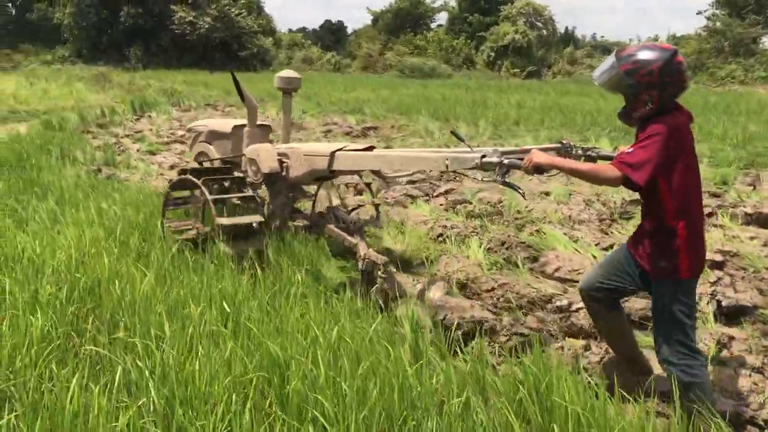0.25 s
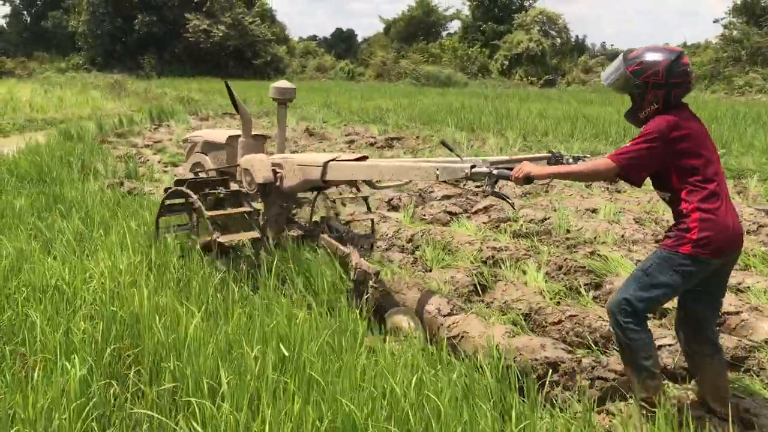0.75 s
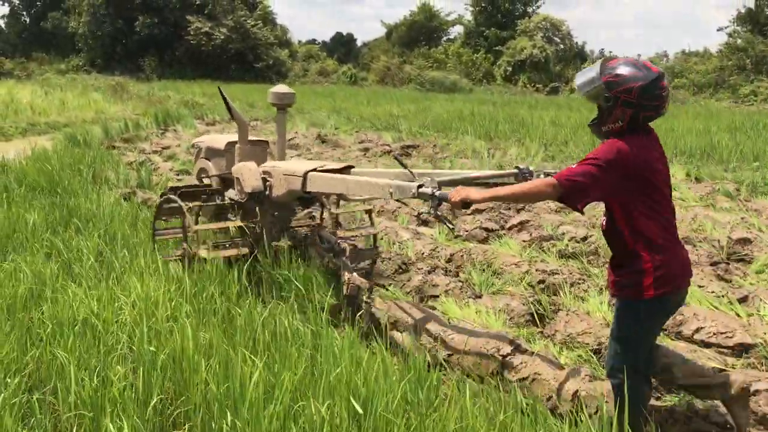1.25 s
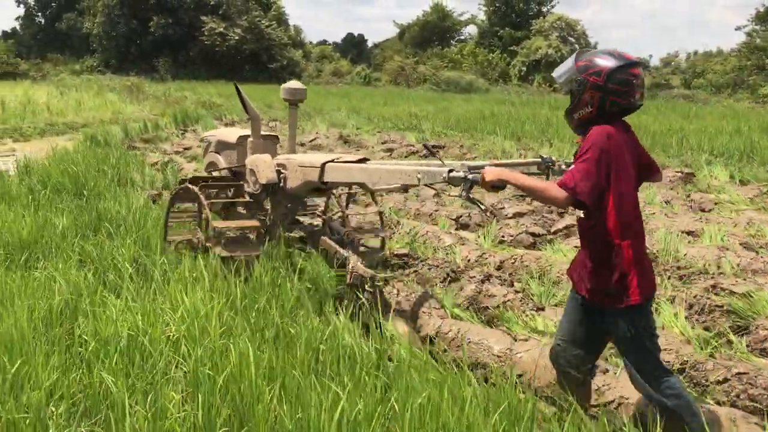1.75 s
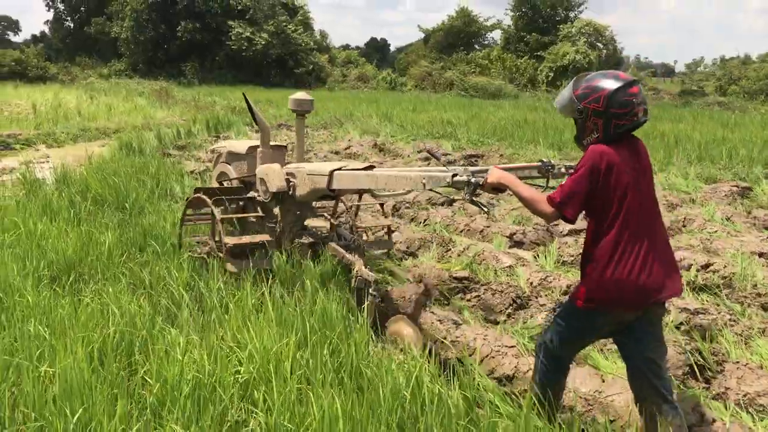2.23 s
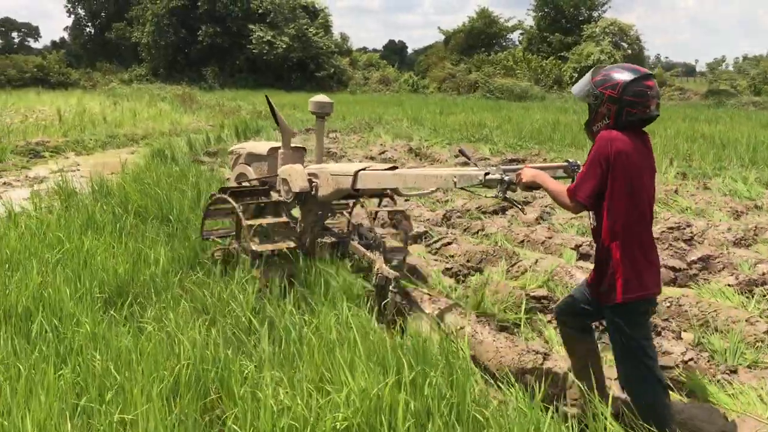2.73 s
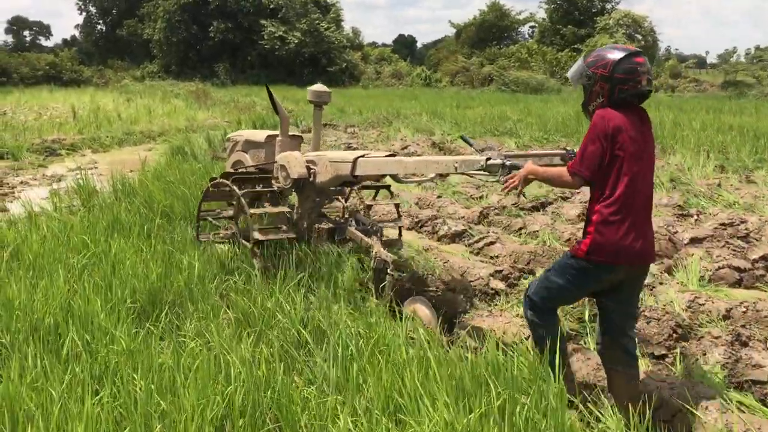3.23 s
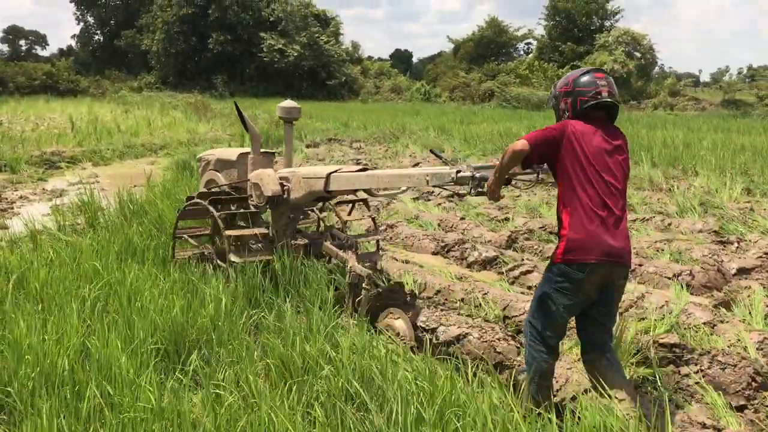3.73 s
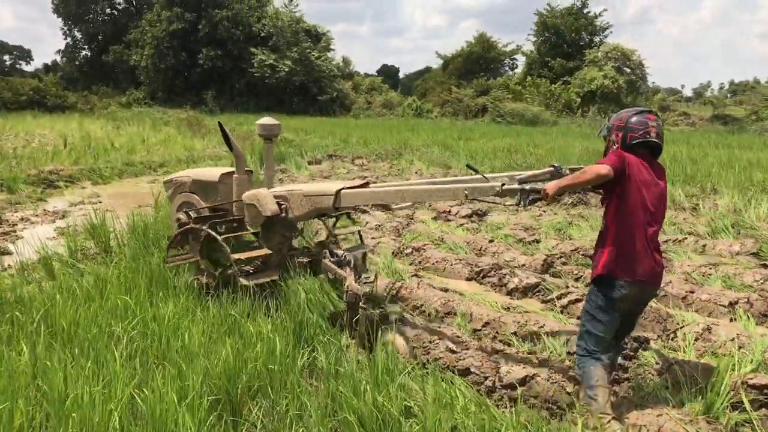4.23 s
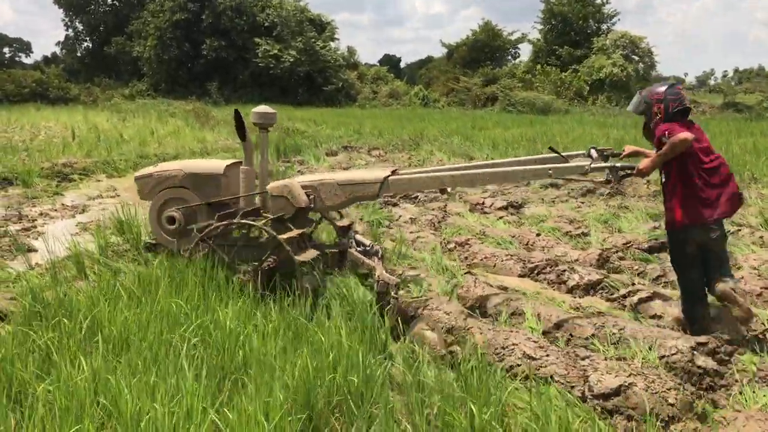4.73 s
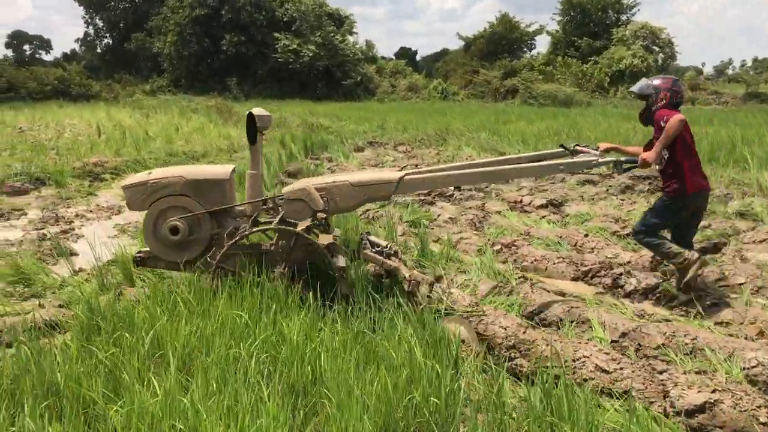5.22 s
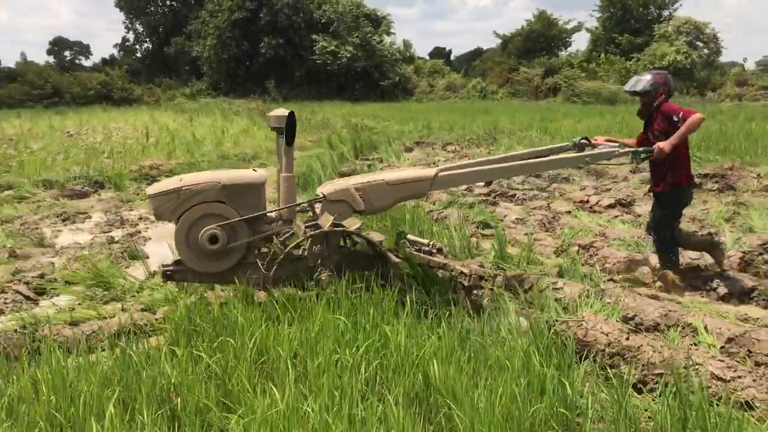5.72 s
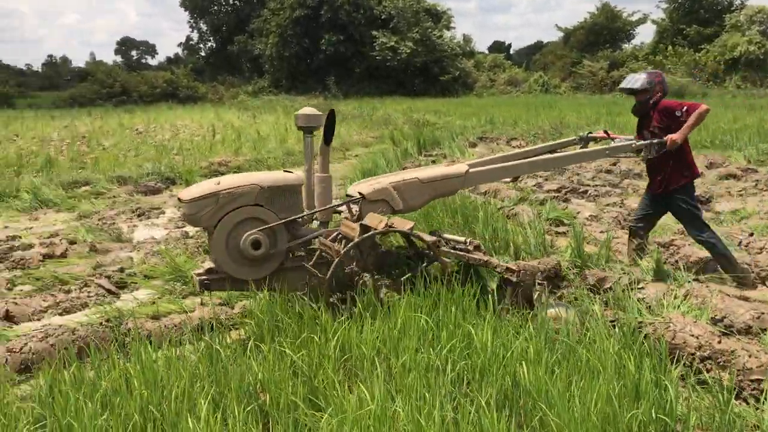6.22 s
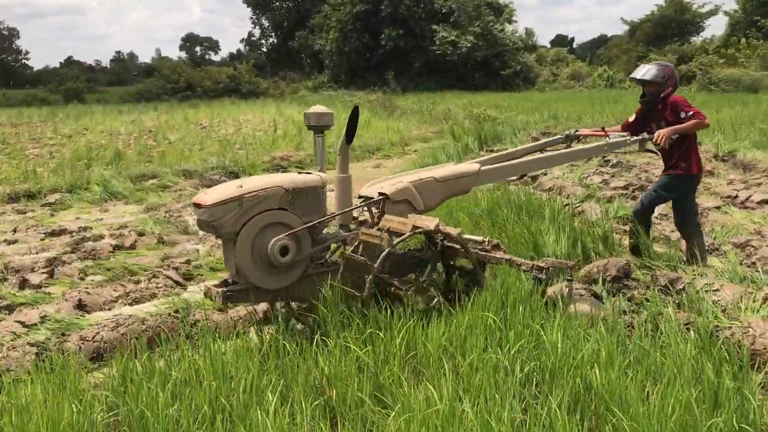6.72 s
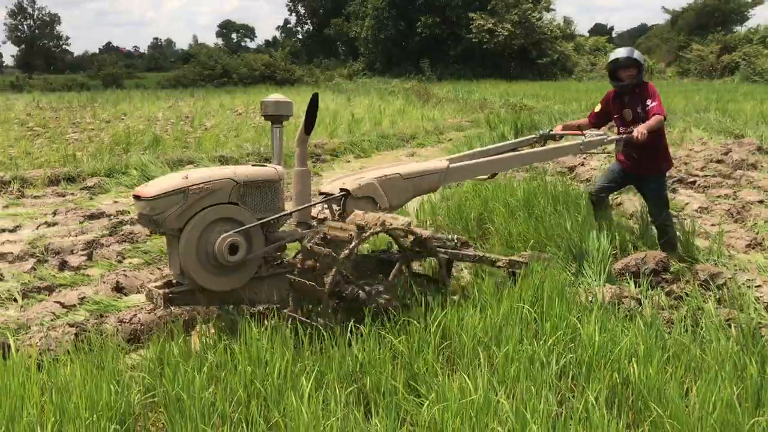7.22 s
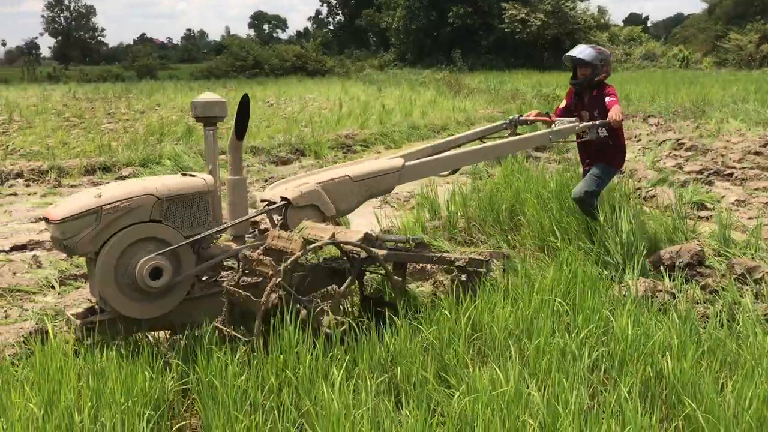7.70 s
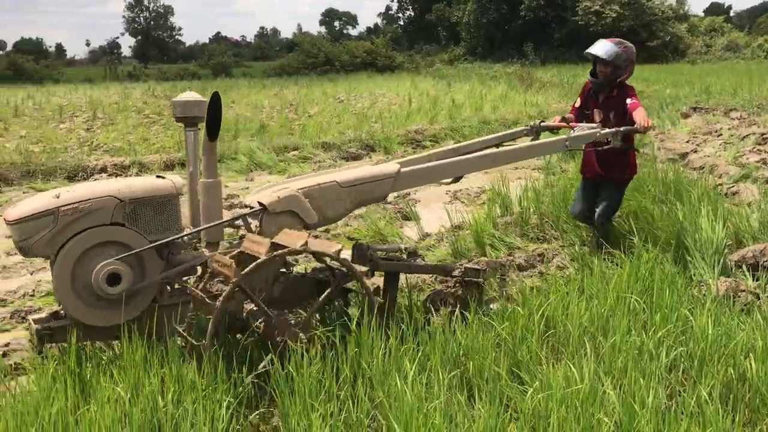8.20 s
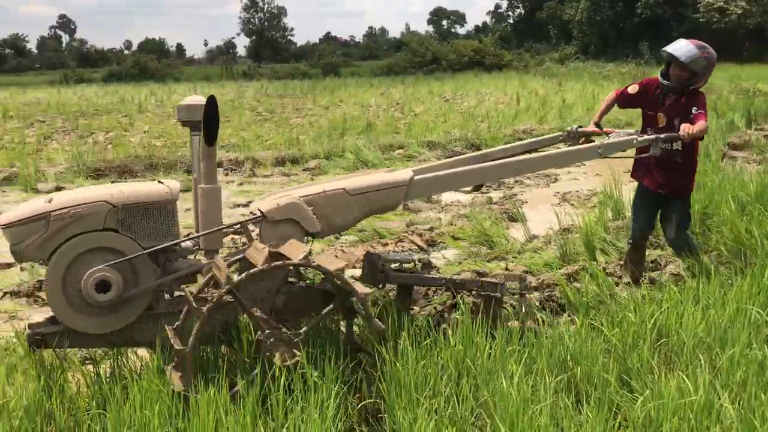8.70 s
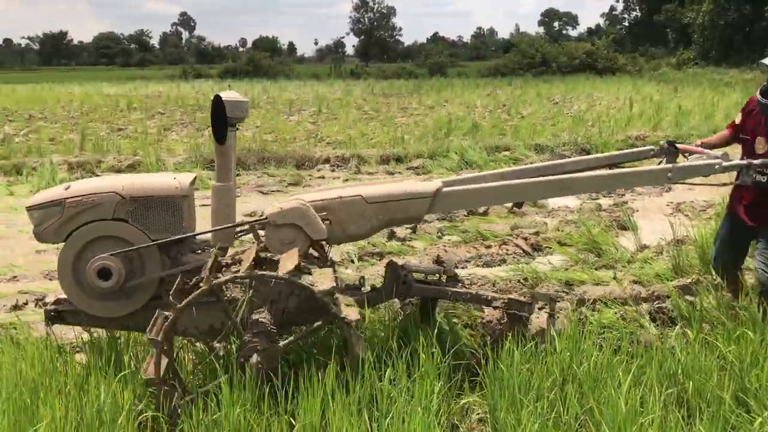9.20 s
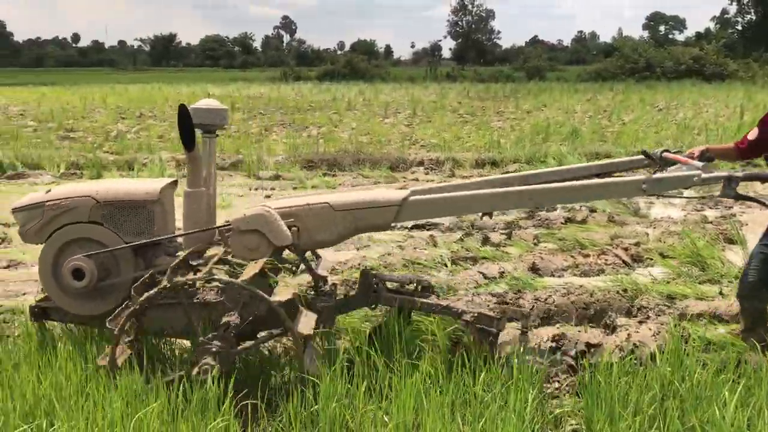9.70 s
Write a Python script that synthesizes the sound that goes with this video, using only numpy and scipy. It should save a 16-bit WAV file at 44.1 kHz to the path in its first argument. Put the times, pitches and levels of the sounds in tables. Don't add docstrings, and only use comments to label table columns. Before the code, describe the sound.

A one-cylinder diesel walking tractor ploughs an open muddy field, heard in mono from a few metres, dry and slightly overloaded on peaks. The engine runs from start to end at roughly seven firings a second, a little slower at first, quickest around 6 s. Each cycle has a hard iron knock, then a rough, whistling burst of exhaust around 2 kHz with hiss, a short low pipe thump, a valve-closing puff and tinny taps. Belt clatter, faint gear whine, cooling air and low rumble fill the gaps. A loose iron clank at 1.0 s precedes a wheezing misfire and weak beat at 1.2 s. Weaker firings follow near 2.5 s. Another clank comes at 3.95 s, then a dull clod thud at 4.1 s. From 4 to 5 s the machine turns side on and the block knock grows fuller. Clanks fall near 5.0, 6.8, 8.8 and 9.0 s; chugging continues to the end.

```python
import sys
import numpy as np
from scipy import signal
from scipy.io import wavfile
from scipy.ndimage import uniform_filter1d

SR = 44100
rng = np.random.default_rng(int(sys.argv[2]) if len(sys.argv) > 2 else 0)


def invert_db(level):
    return 10 ** (np.asarray(level, dtype=float) / 20)


def bounce(signal):
    frames = np.transpose(np.atleast_2d(signal))
    limited = np.clip(frames, -1, 1)
    pcm = np.round(limited * 32767).astype(np.int16)
    wavfile.write(sys.argv[1], SR, pcm)


N = 438794
CYCLES = 70

# start_s, turn (0 away, 1 side on), muffler_shell_hz, effort_db
HEADING = [(0, 0.06, 2340, -0.7), (2, 0.15, 2220, 0.6), (3, 0.14, 2400, 1.8), (3.5, 0.2, 2470, -2.8),
           (4.2, 0.37, 2470, 0.6), (5, 0.97, 2180, -2), (5.8, 1, 2130, -2.1), (6.6, 0.92, 2270, 2.5),
           (7, 0.84, 2300, 2.1), (7.65, 0.99, 2150, 3.5), (8, 0.95, 2120, -0.7), (8.8, 1, 2200, 2),
           (9.95, 1, 2400, -2.5)]
# pitch_hz, width_hz, away_db, side_on_db
OUTLET = [(1030, 41, -6, -6.5), (1535, 63, 9.5, 10.5), (1922, 44, 5.5, 2.5), (2816, 170, 5.5, 6.5),
          (3368, 210, 8, 9), (3710, 156, -60, 7.5), (4720, 230, 6.5, -32), (6310, 77, 0, -6)]
# pitch_hz, level_db (per Hz)
JET = [(300, -2.5), (480, -36), (700, -33), (1100, -49), (1600, -4), (2350, 4), (3000, 4), (4000, -13),
       (5000, -53)]
HISS = [(3500, -29), (5000, -8), (6700, 6.5), (7500, -7), (9400, 3), (10500, -1), (12500, 5.5), (16000, 2)]
BLOCK = [(180, 3.5), (480, -9), (1000, 1.5), (1650, 3.5), (3000, -2), (4500, -12), (7500, -67.5),
         (16000, -66)]
SHUT = [(300, 10.5), (480, -15.5), (800, -0.5), (1300, 0), (2400, 9), (3300, 0), (4200, -8), (7500, -17),
        (16000, -32)]


def evened(x):
    return x / np.sqrt(np.mean(x ** 2) + 1e-20)


def colour(x, points):
    hz = np.abs(np.fft.fftfreq(8192, 1 / SR))
    point_hz, point_db = np.transpose(points)
    gain_db = np.interp(np.log(hz + 1), np.log(point_hz), point_db, left=-70, right=-70)
    log_gain = np.log(invert_db(gain_db))
    spectrum = np.exp(log_gain - 1j * signal.hilbert(log_gain).imag)
    taps = np.fft.ifft(spectrum).real[:2048]
    return signal.oaconvolve(x, taps / np.linalg.norm(taps))[:N]


def resonate(x, hz, width):
    r = np.exp(-np.pi * width / SR)
    if np.ndim(hz) == 0:
        c = r * np.cos(2 * np.pi * hz / SR)
        return 2 * (1 - r) * signal.lfilter([1, -c], [1, -2 * c, r ** 2], x)
    spin = np.exp(2j * np.pi * np.cumsum(hz) / SR)
    return 2 * (spin * signal.lfilter([1 - r], [1, -r], x * spin.conj())).real


def train(s, db, shape):
    at = np.round(np.asarray(s) * SR).astype(int)
    inside = (at >= 0) & (at < N)
    marks = np.zeros(N)
    marks[at[inside]] = invert_db(db * np.ones(len(at)))[inside]
    return signal.oaconvolve(marks, shape)[:N]


def burst(rise, hold, t60):
    t = np.arange(8000) / SR
    attack = np.sin(np.pi / 2 * np.minimum(t / rise, 1)) ** 2
    return attack * invert_db(-60 * np.maximum(t - rise - hold, 0) / t60)


def held(s, values):
    return values[np.clip(np.searchsorted(s, np.arange(N) / SR) - 1, 0, len(s) - 1)]


def grit(lump_db, span):
    lumps = evened(uniform_filter1d(rng.standard_normal(N), max(round(span * SR), 1)))
    return evened(rng.standard_normal(N) * invert_db(lump_db * lumps))


def ticks(per_s, spread_db):
    size = invert_db(spread_db * np.minimum(rng.exponential(1, N), 4)) * rng.choice([-1, 1], N)
    return evened(size * (rng.random(N) < per_s / SR))


def control(s, count):
    return np.interp(s, np.transpose(HEADING)[0], np.transpose(HEADING)[count])


def along(rows, count):
    return np.interp(np.arange(N) / SR, np.transpose(rows)[0], np.transpose(rows)[count])


def facing(x, modes, s, scatter_db):
    turn = np.clip(control(s, count=1), 0, 1)
    luck = rng.standard_normal((len(s), len(modes)))
    cycle = held(s, np.arange(len(s)))
    total = np.zeros(N)
    for k, (hz, width, away_db, side_db) in enumerate(modes):
        mode_db = away_db + turn * (side_db - away_db) + scatter_db * luck[:, k]
        total += resonate(x * invert_db(mode_db)[cycle], hz, width)
    return total


def crank():
    # cycle_number, length_ms
    pace = [(0, 145.0), (6, 142.23), (8, 136.06), (10, 142.36), (13, 136.66), (18, 143.66), (24, 137.87),
            (26, 138.77), (30, 131.86), (32, 133.28), (37, 132.16), (45, 127.1), (51, 136.68), (57, 138.61),
            (58, 141.24), (63, 137.68), (66, 137.25), (68, 130.77)]
    # cycle_number, charge_db
    charges = [(6, 0.6), (7, -1.4), (8, -4.4), (12, 1.0), (26, -0.8), (29, -0.6), (30, -0.9), (31, -1.8),
               (33, -1.3), (35, -1.1), (37, -1.7), (41, -1.0), (43, -2.8), (45, -1.3), (46, 0.9),
               (47, -0.6), (48, -1.0), (53, 0.6), (54, 0.8), (55, -0.6), (56, -1.1), (58, 1.0), (63, -4.2),
               (68, -1.2)]
    first_s, hurry_ms_per_db = .09149, 2.19
    kept = .9
    number, db = np.transpose(charges)
    charge_db = np.zeros(CYCLES)
    charge_db[number.astype(int)] = db
    pace_ms = np.interp(np.arange(CYCLES), *np.transpose(pace))
    hurry_ms = hurry_ms_per_db * signal.lfilter([1], [1, -kept], charge_db)
    length = (pace_ms - hurry_ms) / 1000
    return first_s + np.cumsum(length) - length, charge_db, np.append(length[0], length[:-1])


def level(usual_db, per_charge, side_db, per_effort, scatter_db):
    s, charge_db, _ = crank()
    work_db = per_charge * charge_db + per_effort * control(s, count=3)
    chance_db = scatter_db * rng.standard_normal(CYCLES)
    return usual_db + work_db + side_db * control(s, count=1) + chance_db


def odd(usual, count):
    # start_s, jet_change_db, knock_change_db, whistle_hz
    odd_cycles = [(.091, 2.3, 0.5, 2930), (.382, 3, 2.5, 2540), (1.097, -1.3, 1, 2300),
                  (1.236, -11, 1, 1910), (1.977, 0, -4.5, 2380), (2.119, -1, -3.5, 2270),
                  (2.404, -3, -1, 2210), (2.548, -4, -0.7, 2270), (2.985, .1, -1, 2540),
                  (3.13, -0.5, -0.5, 2180), (3.694, 1.1, .1, 1950), (3.834, -2.1, -0.3, 2040),
                  (3.975, -1.3, 2.5, 2400), (4.114, -0.2, -1, 1960), (4.39, -0.5, 0, 2205),
                  (4.527, -0.5, 3, 1870), (4.667, 1.6, 0.5, 2750), (5.377, -1.5, 2.2, 2370),
                  (5.521, 2, 4.5, 2670), (5.805, -1, 0.5, 2160), (6.223, 0.8, 1.5, 2160),
                  (6.364, 1.2, .6, 2600), (7.652, 2.1, -1.3, 2630), (8.08, 1, 0.5, 2370),
                  (8.799, -0.5, -0.5, 2400), (9.081, 0, 1.5, 2340), (9.229, 0, 5, 2270),
                  (9.376, -0.3, .1, 2830), (9.523, 0.5, -0.2, 2020), (9.81, 2.5, 1, 2860)]
    out = usual * np.ones(CYCLES)
    nearest = [np.argmin(abs(crank()[0] - row[0])) for row in odd_cycles]
    out[nearest] = np.transpose(odd_cycles)[count]
    return out


def rattle():
    # pitch_hz, level_db (per Hz)
    clatter_colour = [(100, -31), (160, -19.5), (230, 0.5), (380, -13), (465, -19.5), (620, -3.5),
                      (850, -9), (960, -5.5), (1250, -4), (2000, -6.5), (2400, -7), (4400, -22.5),
                      (6000, -60)]
    air_colour = [(3500, 3.5), (5000, -5.5), (6700, -3.5), (7600, -7), (9400, -1), (10500, -7), (11500, 0),
                  (16000, -1)]
    # start_s, level_db
    draught = [(0, -46), (.3, -39), (.7, -43.5), (2.5, -44.5), (4, -45.5), (5, -48.5), (6.6, -48), (7, -46),
               (9, -46), (9.95, -47.5)]
    clatter = colour(0.97 * grit(2.2, 0.013) + 0.43 * ticks(1500, 0.87), clatter_colour)
    air = colour(grit(1.0, 0.022), air_colour)
    wander_db = 1.5 * evened(uniform_filter1d(rng.standard_normal((2, N)), SR // 4, axis=1))
    clatter_db = -38.5 + 0.8 * along(HEADING, count=3) + wander_db[0]
    air_db = along(draught, count=1) - 1.4 + wander_db[1]
    return invert_db(clatter_db) * clatter + invert_db(air_db) * air


def gears():
    # teeth_per_cycle, away_db, side_on_db
    gear_teeth = [(112, -50, -56), (135, -54, -56), (157, -51, -55), (184, -55, -57)]
    s, t = crank()[0], np.arange(N) / SR
    turn = np.clip(along(HEADING, count=1), 0, 1)
    steady = uniform_filter1d(np.interp(t, s, np.arange(len(s))), 9000)
    before_first = (t - s[0]).clip(max=0) * 7
    surge = .0022 * np.cos(2 * np.pi * steady)
    cycles = steady + before_first + surge
    sway = evened(uniform_filter1d(rng.standard_normal((len(gear_teeth), N)), 1800, axis=1))
    whine = np.zeros(N)
    for (teeth, away_db, side_db), drift in zip(gear_teeth, sway):
        whine_db = away_db + turn * (side_db - away_db) + 5 + 4 * drift
        whine += invert_db(whine_db) * np.sin(2 * np.pi * teeth * cycles)
    return whine


def ignitions():
    s, _, length = crank()
    return s - 0.2168 * length - .0015 * control(s, count=1)


def intake():
    s = ignitions()
    t = np.arange(4000) / SR
    gulp = np.sin(2 * np.pi * 82 * t) * burst(0.0145, 0.035, 0.027)[:len(t)]
    gulps = train(s - .031, -37 + 0.96 * rng.standard_normal(len(s)), gulp)
    rumble_colour = [(25, -33), (50, -13), (85, -6.5), (140, -5.5), (200, -16), (400, -18)]
    return gulps + invert_db(-42.5) * colour(rng.standard_normal(N), rumble_colour)


def knock():
    # pitch_hz, width_hz, away_db, side_on_db
    block_modes = [(258, 30, 11, 19), (297, 33.4, 22, 16), (384, 50, 11.5, 16.5), (660, 112, 18.5, 19.5),
                   (963, 170, 7, 14.5), (1160, 85, 17, -9), (1300, 57, 19.5, -9), (1554, 220, 6, 1),
                   (1560, 37, 19, 22), (1870, 24, -8, -18), (2160, 38, -2, -11), (2916, 63, 19, -8)]
    s = ignitions()
    knock_db = level(-29, per_charge=0.8, side_db=3, per_effort=1.12, scatter_db=1.06) + odd(0, count=2)
    block_hz = 1400 + 150 * rng.standard_normal(CYCLES)
    clicks = 0.92 * ticks(1500, 1.6) + 0.57 * grit(3.6, 0.0012)
    raps = clicks * train(s - .001, knock_db, burst(0.0015, 0.0037, 0.11))
    modes = facing(raps, block_modes, s, scatter_db=1.4)
    rung = invert_db(3.0) * resonate(raps, held(s, block_hz), 170) + invert_db(-3.0) * modes
    dulled = signal.lfilter(*signal.butter(1, 4200, fs=SR), rung)
    return invert_db(-3.5) * colour(raps, BLOCK) + dulled


def firings():
    s, charge_db, _ = crank()
    jet_db = level(-11.5, per_charge=1.17, side_db=1, per_effort=0, scatter_db=-0.04) + odd(0, count=1)
    hidden_db = -4 * np.sin(np.pi * np.clip(control(s, count=1), 0, 1)) ** 2
    hiss_db = level(-5.5, per_charge=1, side_db=1.6, per_effort=0, scatter_db=1.5)
    hiss_db = hiss_db + hidden_db - .5 * odd(0, count=1)
    whistle_hz = 2340 + 56 * charge_db + 106 * rng.standard_normal(CYCLES)
    return s, jet_db, hiss_db, odd(whistle_hz, count=3)


def jet():
    s, jet_db, hiss_db, hz = firings()
    s = s - .0014 - .0006 * control(s, count=1)
    gas = grit(1.0, 0.0012) * train(s, jet_db, burst(0.0042, 0.0023, 0.036))
    whistle_hz = held(s, hz)
    whistle = resonate(resonate(gas, whistle_hz, 310), whistle_hz, 310)
    core = invert_db(17) * resonate(gas, whistle_hz, 70)
    roar = invert_db(-1.5) * colour(gas, JET) + invert_db(-3.0) * whistle + core
    roar = roar + facing(gas, OUTLET, s, scatter_db=2.5)
    fast = burst(0.0051, 0.0026, 0.039)
    slow = invert_db(-27.5) * burst(0.005, 0.0066, 0.19)
    hiss = colour(grit(2.3, 0.0006) * train(s, jet_db + hiss_db - 3.0, fast + slow), HISS)
    late_gas = grit(2.5, 0.0022) * train(s + 0.0063, jet_db - 1.5, burst(0.004, 0.003, 0.14))
    return roar + hiss + resonate(late_gas, 630, 96)


def gas_pulse(lag, time):
    u = np.maximum(np.arange(4000) / SR - lag, 0) / time
    return u ** 2 * np.exp(-u) / (2 * time * SR)


def thump():
    # pitch_hz, width_hz, strength (signed)
    pipe = [(63.3, 23.9, .97), (122.8, 11.9, .28), (102.4, 22.3, -.674), (176.9, 29, -.226)]
    t = np.arange(8000) / SR
    ring = sum(a * np.exp(-np.pi * width * t) * np.cos(2 * np.pi * hz * t) for hz, width, a in pipe)
    slugs = gas_pulse(.0023, .0012) + gas_pulse(.0373, .004)
    open_end = signal.butter(2, 108, "high", fs=SR, output="sos")
    shape = signal.sosfilt(open_end, np.convolve(slugs, ring))
    thump_db = level(.6, per_charge=1, side_db=-.1, per_effort=.15, scatter_db=.2)
    return train(crank()[0], thump_db, shape)


def valves():
    # pitch_hz, width_hz, away_db, side_on_db
    tin = [(896, 24, 22, 11), (1160, 99, 25.5, 24.5), (1410, 18, 14, 14), (1550, 51, 17, 21.5),
           (2120, 43, 9, 16), (2400, 59, 19, 12)]
    s = ignitions()
    shut_db = level(-33, per_charge=-0.5, side_db=3.5, per_effort=-0.2, scatter_db=4.4)
    last_gas = grit(0.64, 0.006) * train(s + 0.0518, shut_db - 0.5, burst(0.0075, 0.0052, 0.041))
    shell_hz = along(HEADING, count=2) * held(s, 1 + .02 * rng.standard_normal(len(s)))
    shell = invert_db(11.0) * resonate(last_gas, shell_hz, 70)
    outlet = facing(last_gas, OUTLET[:2], s, scatter_db=1.3)
    beats = train(s + 0.0833, -44.5, burst(0.0049, 0.0075, 0.028)) + invert_db(-56.5)
    taps = facing(ticks(600, 1.6) * beats, tin, s, scatter_db=2.5)
    return colour(last_gas, SHUT) + shell + outlet + taps


def clanks():
    # start_s, peak_db, pitch_hz, t60_s
    clank_rows = [(1.015, -9, 2340, 0.088), (1.171, -31, 1360, 0.069), (1.238, -21, 2280, 0.048),
                  (3.614, -47, 956, 0.09), (3.952, -14.5, 2400, 0.13), (4.019, -40, 1180, 0.09),
                  (5.042, -18, 1260, 0.058), (5.293, -32, 1160, 0.11), (5.579, -37, 1180, 0.09),
                  (7.564, -32, 1380, 0.065), (6.768, -24, 2400, .03), (8.842, -9, 1980, 0.05),
                  (8.853, -18.5, 2800, 0.091), (9.036, -19, 2400, 0.059), (9.11, -32, 2360, 0.051)]
    s, peak_db, hz, t60 = np.transpose(clank_rows)
    shake = sum(train([a], db - 10.5, burst(0.0022, 0.0084, d)) for a, db, d in zip(s, peak_db, t60))
    blows = (0.43 * ticks(5700, 3.0) + 0.81 * grit(0.93, .002)) * shake
    iron_hz = held(s, hz)
    ring = resonate(blows, iron_hz, 100) + 0.7 * resonate(blows, 0.67 * iron_hz, 150)
    thud = np.sin(2 * np.pi * 290 * np.arange(8000) / SR) * burst(.004, 0.0056, 0.054)
    clod = train([4.072], -26.5, thud)
    return invert_db(-5.5) * colour(blows, JET) + invert_db(0.5) * colour(blows, BLOCK) + invert_db(15.0) * ring + clod


def misfire():
    gas = grit(1.7, .002) * train([1.213], -26, burst(rise=.016, hold=.014, t60=.05))
    breath = colour(gas, JET) + invert_db(-4.0) * colour(gas, HISS) + invert_db(-1.0) * colour(gas, SHUT)
    return breath + invert_db(6.5) * resonate(gas, 4400, 900)


def scene():
    engine = gears() + intake() + knock() + jet() + thump() + valves() + misfire()
    return (rattle() + engine + clanks())[None]


def band_limit(x):
    return signal.sosfilt(signal.butter(12, 16980, fs=SR, output="sos"), x)


def record(dry):
    soft = .72 * np.tanh(dry / .72 + .2 * (dry / .72) ** 3)
    treble_cut = signal.firwin(1023, 15770, window=("kaiser", 4), fs=SR)
    mix = signal.oaconvolve(soft, treble_cut[None], "same")
    return band_limit(mix)


dry = scene()
out = record(dry)
bounce(out)
```